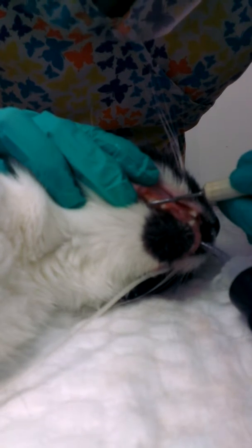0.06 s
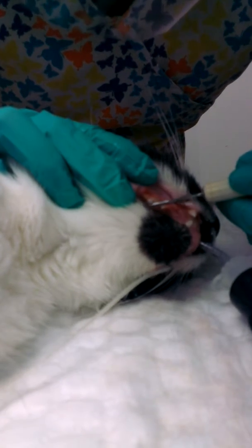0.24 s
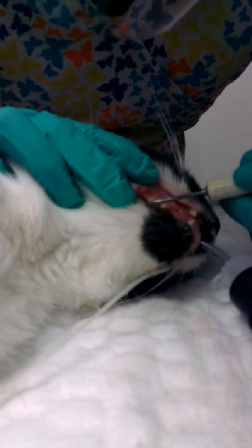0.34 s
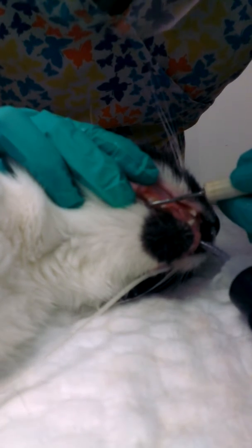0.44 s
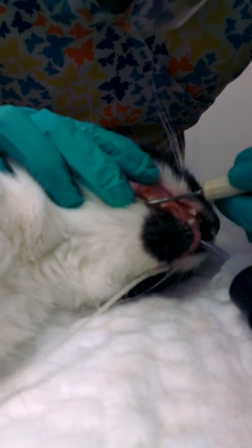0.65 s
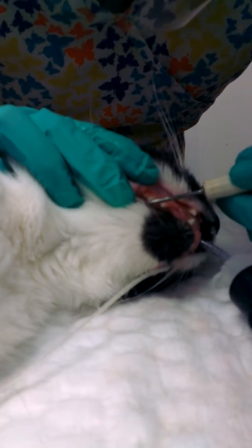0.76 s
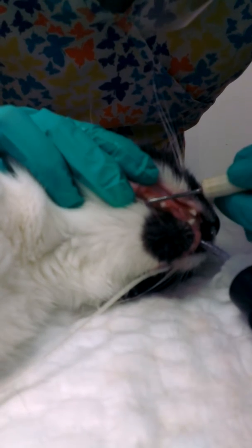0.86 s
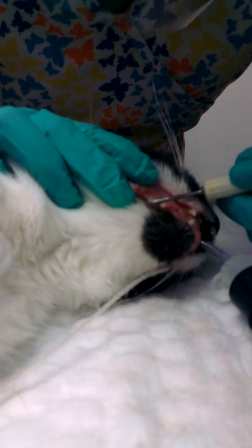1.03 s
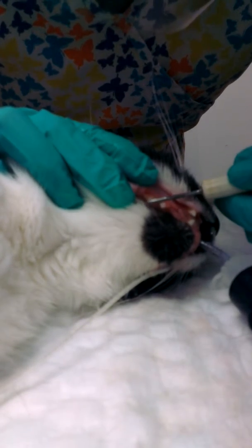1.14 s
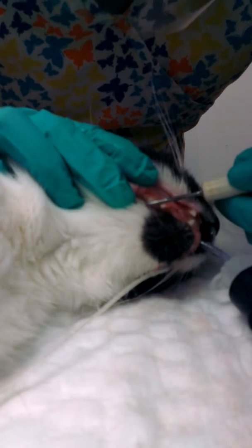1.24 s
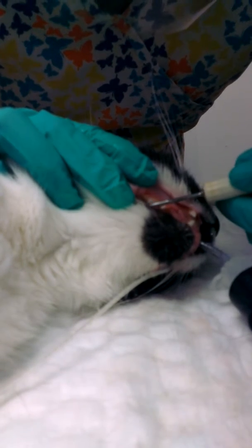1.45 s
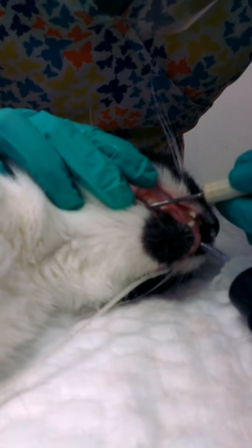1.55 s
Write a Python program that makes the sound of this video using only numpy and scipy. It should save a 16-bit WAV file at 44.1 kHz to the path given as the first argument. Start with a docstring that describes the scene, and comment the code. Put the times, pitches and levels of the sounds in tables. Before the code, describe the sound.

A powered dental scaler chirps lightly on an animal's teeth, then gives its loudest thin, very high squeal at about 0.3 seconds. Faint warbling chatter leads to a longer squeal from 0.65 to 0.8 seconds. Short squeals return near 1.0 and 1.3 seconds, with a tiny chirp near 1.5. Faint water spray hiss and low fan hum continue throughout in the small room.

```python
"""A powered dental scaler squeals on an animal's teeth in a small clinic room.
Pressed on a tooth, the vibrating tip locks on one thin note near 9 kHz. When it bounces, modulation
splits the note into warbling sidebands above and below it. Hard pressure adds a subharmonic buzz,
light touches chirp and dry scrapes rasp. Behind the tip, a water spray hisses and spits as
broadband noise, and motors and mains hum in the low rush of fans."""
import sys
import numpy as np
from scipy import signal
from scipy.fft import rfft, irfft
from scipy.io import wavfile
from scipy.ndimage import uniform_filter1d

SR = 44100
rng = np.random.default_rng(int(sys.argv[2]) if len(sys.argv) > 2 else 0)


def log_audio(samples):
    """Write samples as a 16-bit WAV file to the path given in sys.argv[1]."""
    # one column per channel
    frames = np.atleast_2d(samples).T
    # limit to full scale, then quantise
    limited = np.clip(frames, -1, 1)
    pcm = np.round(limited * 32767).astype(np.int16)
    wavfile.write(sys.argv[1], SR, pcm)


N = 70560
T, FREQS = np.arange(N) / SR, np.fft.rfftfreq(N, 1 / SR)
TIP_HZ = 8969
RASP_DB, JITTER_HZ = -6, 260  # depth and bandwidth of the unevenness of rough contact

# Firm contacts. Each row: start, swell time and fade time in seconds, then first, crest and last
# level in dB.
FIRM_CONTACTS = [(.299, 0.022, 0.0054, -35, -25, -27), (.641, 0.0044, 0.025, -40, -40.5, -44.5),
                 (.666, 0.053, 0.012, -43.5, -31.5, -42), (0.729, 0.0097, 0.027, -36, -28.5, -46),
                 (.767, .015, 0.054, -44, -55, -64), (0.966, 0.015, 0.0035, -47.5, -39, -50),
                 (0.992, 0.0063, 0.0039, -41, -40.5, -35.5), (1.028, 0.024, 0.013, -36, -40, -36),
                 (1.283, 0.047, 0.0095, -40, -32.5, -38.5), (1.341, 0.0028, 0.016, -72, -40.5, -55)]

def squeals():
    """Forced vibration: the pressed tip locks on its note and scrapes a little grit off the tooth."""
    rise_s, stop_s = 0.0013, 0.0027
    envelope = np.zeros(N)
    for start, swell, fade, *levels_db in FIRM_CONTACTS:
        t = T - start
        gate = np.clip(t / rise_s, 0, 1) * np.clip(1 - (t - swell - fade) / stop_s, 0, 1)
        contour = amp(np.interp(t, [0, swell, swell + fade], levels_db))
        envelope = np.maximum(envelope, gate * contour)
    note = np.sin(phase(TIP_HZ + 1.6 * drift(28)))
    grit = amp(-48) * noise(HISS_SPECTRUM)
    tremble = amp(0.5 * drift(140))
    return envelope * (tremble * note + grit)


# Bouncing contacts. Each row: start and length in seconds, level in dB, then first, middle and last
# bounce rate in Hz.
BOUNCING_CONTACTS = [(.027, 0.0077, -51.5, 1040, 1900, 2530), (0.037, 0.016, -49.5, 1880, 1790, 1900),
                     (0.325, 0.02, -28.5, 283, 617, 717), (0.385, 0.017, -48.5, 1610, 1840, 1950),
                     (0.408, 0.021, -48.5, 1580, 1864, 1810), (0.49, 0.0069, -53, 2170, 2280, 2170),
                     (0.55, 0.032, -50.5, 1455, 1910, 1650), (0.62, 0.036, -59, 2880, 2503, 2250),
                     (0.636, 0.017, -53, 1510, 1920, 1700), (.724, 0.0098, -51.5, 2370, 2160, 1900),
                     (0.741, 0.025, -54, 1715, 1950, 1940), (0.765, 0.019, -52, 1640, 1686, 2250),
                     (0.781, 0.016, -55, 1710, 1630, 2170), (0.793, 0.038, -57.5, 2666, 2580, 2390),
                     (0.826, 0.023, -56, 1560, 2060, 1800), (0.865, 0.021, -59, 1120, 2414, 1650),
                     (0.908, 0.012, -59, 1090, 1900, 2180), (0.923, 0.0098, -55.5, 1240, 1940, 1550),
                     (0.936, 0.015, -60, 1400, 1850, 1840), (0.985, 0.0097, -57.5, 2420, 2410, 2550),
                     (1.003, 0.026, -62.5, 2500, 2610, 2620), (1.019, 0.012, -50, 2570, 2635, 2400),
                     (1.085, 0.009, -56.5, 2640, 2670, 2600), (1.26, 0.0089, -56.5, 2540, 2560, 2460),
                     (1.338, 0.0082, -53, 2540, 2566, 2680), (1.345, 0.015, -52.5, 2825, 2890, 3060),
                     (1.367, 0.035, -68.5, 2960, 2900, 2930)]
# Weighting of the sidebands. Each row: frequency in Hz, gain in dB.
SIDEBAND_GAINS = [(6200, 0.5), (7200, -7.5), (8350, -4.5), (11800, 1)]

def bounces():
    """Modulation: bouncing puts sidebands about one bounce rate from the note, and weaker ones beyond."""
    out, grit = np.zeros(N), noise(HISS_SPECTRUM)
    for start, length, db, first_hz, middle_hz, last_hz in BOUNCING_CONTACTS:
        progress, swell = arch(length, 0.5)
        n = len(progress)
        glide = np.polyfit([0, 0.5, 1], [first_hz, middle_hz, last_hz], 2)
        rate = np.polyval(glide, progress) * (1 + 0.075 * drift(JITTER_HZ)[:n])
        roughness = amp(RASP_DB) * min(middle_hz / 1900, 1)  # faster blows are more uneven
        swell = swell * unit(1 + roughness * drift(0.2 * middle_hz)[:n])
        for order in (-2, -1, 0.98, 1.7):
            hz = TIP_HZ + order * rate
            gain = amp(db - 33 * (abs(order) - 1)) * gain_at(SIDEBAND_GAINS, hz)
            add(out, start, swell * gain * np.sin(phase(hz)))
        chatter = (1 + np.cos(phase(rate))) * grit[int(start * SR):][:n]  # each blow scrapes
        add(out, start, swell * amp(db - 30) * chatter)
    return out


# Light touches. Each row: start and length in seconds, level in dB.
LIGHT_TOUCHES = [(0.105, 0.0056, -53.5), (0.13, 0.0029, -52.5), (.178, 0.0035, -42.5), (0.188, 0.0033, -52),
                 (0.202, 0.004, -44), (0.228, 0.008, -38.5), (0.231, 0.0049, -43), (0.236, 0.0066, -34),
                 (0.242, 0.008, -40.5), (0.855, 0.015, -59), (0.958, 0.0055, -41), (1.186, 0.0085, -45.5),
                 (1.2754, 0.0049, -37.5), (1.473, 0.0079, -45.5)]

def touches():
    """Random frequency modulation: grazing contacts give short unsteady chirps with a little scratch."""
    out, scratch = np.zeros(N), amp(-26.5) * noise(HISS_SPECTRUM)
    scatter_hz = 109
    for start, length, db in LIGHT_TOUCHES:
        _, swell = arch(length, 0.79)
        n = len(swell)
        chirp = np.sin(phase(TIP_HZ + scatter_hz * drift(470)[:n]))
        add(out, start, amp(db) * swell * (chirp + scratch[int(start * SR):][:n]))
    return out


# Hard presses. Each row: start and length in seconds, then levels of the low and the high tone in dB.
HARD_PRESSES = [(0.315, 0.010, -66, -47), (0.648, 0.092, -68, -57.5), (0.698, 0.039, -61.5, -59),
                (0.749, 0.022, -66, -59), (1.027, 0.036, -63, -66), (1.051, 0.013, -67, -59),
                (1.061, 0.018, -57, -68)]

def buzzes():
    """Period doubling: hard pressure adds tones at a half and at one and a half times the pitch."""
    low, high = np.zeros((2, N))
    angle = phase(TIP_HZ + 24.3 * drift(260))
    for start, length, low_db, high_db in HARD_PRESSES:
        _, swell = arch(length, 0.47)
        add(low, start, amp(low_db) * swell)
        add(high, start, amp(high_db) * swell)
    rasp = 1 + amp(RASP_DB) * drift(JITTER_HZ) / 2
    return rasp * (low * np.sin(0.5 * angle) + high * np.sin(1.5 * angle))


# Dry scrapes. Each row: start and length in seconds, level in dB.
DRY_SCRAPES = [(0.795, 0.015, -66), (1.011, 0.019, -62), (1.321, 0.038, -67.5)]
# Spectrum of a scrape. Each row: frequency in Hz, relative spectral density in dB.
SCRAPE_SPECTRUM = [(3500, -24), (5200, 5), (6500, -25), (11500, -14), (12700, -12), (14500, -7)]

def scrapes():
    """Friction noise: the tip drags over the tooth with a short dry rasp."""
    envelope = np.zeros(N)
    for start, length, db in DRY_SCRAPES:
        _, swell = arch(length, 0.47)
        add(envelope, start, amp(db) * swell)
    return envelope * noise(SCRAPE_SPECTRUM)


# Envelope of the free-running tip. Each row: time in seconds, level in dB.
WHINE_ENVELOPE = [(0, -57), (.05, -90), (.12, -65), (.26, -59), (.41, -95), (.45, -60), (.55, -87),
                  (.62, -58.5), (.88, -81), (.905, -59), (.94, -76), (1.09, -88), (1.14, -64), (1.21, -54),
                  (1.25, -77), (1.41, -56.5), (1.45, -81), (1.52, -55), (1.6, -63)]

def idle_whine():
    """Unloaded vibration: the running tip keeps a faint, wavering whine, heard between contacts."""
    return level(WHINE_ENVELOPE) * np.sin(phase(TIP_HZ + 20.3 * drift(160)))


# Spectrum of the spray and of the tip's grit. Each row: frequency in Hz, relative density in dB.
HISS_SPECTRUM = [(900, -17.5), (3000, -17.5), (4000, -12.5), (5000, -4.5), (6500, -4), (8000, -5),
                 (8650, 0), (8960, 15), (9300, 4), (10200, -0.5), (11500, 0.5), (13000, -8.5), (15000, -7)]
# Envelope of the spray. Each row: time in seconds, level in dB.
SPRAY_ENVELOPE = [(0, -66.5), (.31, -65), (.335, -58.5), (.355, -61.5), (.55, -67), (.7, -62), (.85, -62),
                  (.95, -65), (1.1, -62), (1.17, -69), (1.27, -63.5), (1.345, -68.5), (1.42, -69),
                  (1.6, -67.5)]
# Larger droplets. Each row: time in seconds, level in dB.
LARGE_DROPLETS = [(0.109, -60.5), (.128, -60), (0.545, -53.5), (1.469, -52.5), (1.475, -55)]

def spray():
    """Shot noise: droplets spit off the tip as random impulses within the hiss of the mist."""
    drops_per_s, tick_decay_s = 1100, 0.00099
    impulses = rng.choice([-1, 1], N) * (rng.random(N) < drops_per_s / SR)
    sizes_db = 4 * np.minimum(rng.exponential(1, N), 3)
    spit = 0.42 * unit(impulses * amp(sizes_db))
    sides = [colour(sputter(rng.standard_normal(N) + spit), HISS_SPECTRUM) for _ in range(2)]
    envelope = level(SPRAY_ENVELOPE)
    for start, db in LARGE_DROPLETS:
        add(envelope, start, amp(db) * np.exp(-T / tick_decay_s))
    return np.array(sides) * envelope * amp([[-0.5], [0]])


def sputter(x, depth_db=2.5):
    """Random amplitude modulation: each frequency band swells and dips on its own."""
    bands = signal.stft(x, nperseg=256)[2]
    patches = uniform_filter1d(rng.standard_normal(bands.shape), size=5, axis=0)
    patches = unit(uniform_filter1d(patches, size=9, axis=1))
    return signal.istft(bands * amp(depth_db * patches), nperseg=256)[1][:N]


# Hum tones. Each row: frequency in Hz, left and right level in dB, left phase lead in radians,
# pitch waver in Hz, flutter as a fraction of the amplitude.
HUM_TONES = [(119, -79.5, -82.5, -1.51, 2.6, 0.25), (210, -71, -68, -1.58, 0.64, 0.11),
             (310.5, -96, -74, -1.4, 2.7, 0.46), (420, -72, -66.5, 1.41, 1.4, 0.64),
             (572, -76, -88.5, 1.94, 3.36, 0.48)]

def hum():
    """Periodic vibration: motors and mains give low tones that waver in pitch and flutter in level."""
    out = np.zeros((2, N))
    for hz, left_db, right_db, lead, waver_hz, flutter in HUM_TONES:
        angle = phase(hz + waver_hz * drift(18)) + 2 * np.pi * rng.random()
        envelope = unit(abs(1 + flutter * drift(32)))
        out[0] += amp(left_db) * envelope * np.sin(angle + lead)
        out[1] += amp(right_db) * envelope * np.sin(angle)
    return out


# Spectrum of the fans at each ear. Each row: frequency in Hz, relative spectral density in dB.
FAN_SPECTRUM_LEFT = [(25, -42), (60, -36), (110, -1.5), (170, -11), (260, -17.5), (350, -22), (470, -12.5),
                     (600, -6), (800, -15), (1200, -22.5), (3000, -24.5), (8000, -22)]
FAN_SPECTRUM_RIGHT = [(25, -40), (60, -20), (110, -14), (170, -4), (260, -2.5), (350, 3.5), (470, 4.5),
                      (600, -19), (800, -15.5), (1200, -22.5), (3000, -26), (8000, -31)]
# Likeness at the two ears. Each row: frequency in Hz, coherence from 0 to 1, left lead in radians.
FAN_COHERENCE = [(113, 0.59, -1.5), (317, 1, 1), (338, 0.97, -4.5), (576, 1, -6), (665, 0.21, -5.5)]

def fans():
    """Partial coherence: the low rush of fans is only partly alike at the two ears."""
    hz, coherences, leads = np.transpose(FAN_COHERENCE)
    coherence, lead = np.interp(FREQS, hz, coherences), np.interp(FREQS, hz, leads)
    right, independent = rng.standard_normal((2, N))
    shared = coherence * np.exp(1j * lead) * rfft(right)
    left = irfft(shared + np.sqrt(1 - coherence ** 2) * rfft(independent), N)
    return np.array([amp(-74) * colour(left, FAN_SPECTRUM_LEFT),
                     amp(-69) * colour(right, FAN_SPECTRUM_RIGHT)])


# Swell of the drone. Each row: time in seconds, gain in dB.
DRONE_GAIN = [(.45, -2), (.85, 1), (1.35, -4.5), (1.48, 5), (1.6, -0.5)]

def equipment():
    """Superposition: fans and hum add, and one narrow band of the sum swells and sinks as a drone."""
    centre_hz, width_hz = 430, 20
    both = fans() + hum()
    drone = irfft(rfft(both) * np.exp(-((FREQS - centre_hz) / width_hz) ** 2), N)
    return both + (level(DRONE_GAIN) - 1) * drone


def room(x, left_db, near_db, tail_db, right_delay_s=2.85e-5):
    """Reflection: echoes from mouth and table, then the room's short tail, follow the direct sound."""
    right = irfft(rfft(x) * np.exp(-2j * np.pi * FREQS * right_delay_s), N)
    direct = np.array([amp(left_db) * x, right])
    near = amp(near_db) * echoes(x, t60_s=0.035, gap_s=0)
    tail = amp(tail_db) * echoes(x, t60_s=0.11, gap_s=0.0054)
    return direct + near + tail


def echoes(x, t60_s, gap_s):
    """Diffuse reverberation: scattered reflections decay exponentially, different at each ear."""
    t = T[:SR // 2]
    response = rng.standard_normal((2, len(t))) * (t > gap_s) * amp(-60 * t / t60_s)
    return signal.fftconvolve(x[None], response / np.linalg.norm(response[0]), axes=1)[:, :N]


def amp(db):
    """Amplitude ratio of a level in decibels."""
    return 10 ** (np.asarray(db) / 20)


def unit(x):
    """Normalisation to rms 1."""
    return x / np.sqrt(np.mean(x ** 2) + 1e-20)


def add(mix, start_s, sound):
    """Superposition of a sound on the mix at a given time."""
    part = mix[max(round(start_s * SR), 0):][:len(sound)]
    part += sound[:len(part)]


def gain_at(spectrum, hz):
    """Gain of a spectrum, interpolated on a log-frequency axis."""
    f, db = np.transpose(spectrum)
    return amp(np.interp(np.log(abs(hz) + 1), np.log(f), db))


def level(curve):
    """Gain over time, interpolated from a curve in dB."""
    return amp(np.interp(T, *np.transpose(curve)))


def colour(x, spectrum):
    """Filtering by a spectrum, scaled to rms 1."""
    return unit(irfft(rfft(x) * gain_at(spectrum, FREQS), N))


def noise(spectrum):
    """Gaussian noise with a given spectrum, at rms 1."""
    return colour(rng.standard_normal(N), spectrum)


def drift(bandwidth_hz):
    """Smooth random fluctuation: low-pass noise of rms 1."""
    low_pass = np.exp(-(FREQS / bandwidth_hz) ** 2) * (FREQS > 0)
    return unit(irfft(rfft(rng.standard_normal(N)) * low_pass, N))


def phase(hz):
    """Phase in radians as the integral of frequency."""
    return 2 * np.pi * np.cumsum(hz) / SR


def arch(length_s, sharpness):
    """Progress from 0 to 1 through a contact, and its envelope of swell and fade."""
    progress = np.linspace(0, 1, int(length_s * SR))
    return progress, abs(np.sin(np.pi * progress ** 0.86)) ** sharpness


def scene():
    """Directivity: the steady note beams to the right, while the unsteady sounds scatter all round."""
    steady = room(squeals() + idle_whine(), left_db=-7.5, near_db=-35, tail_db=-28)
    rattle = room(bounces(), left_db=-2.5, near_db=-3, tail_db=-10.5)
    brief = room(touches() + buzzes() + scrapes(), left_db=-4, near_db=-12, tail_db=-6)
    return steady + rattle + brief + spray() + equipment()


def record(dry, cutoff_hz=15400):
    """Band limiting: a steep low-pass filter removes the highest treble."""
    low_pass = signal.firwin(401, cutoff_hz, window=("kaiser", 9), fs=SR)
    return signal.oaconvolve(dry, low_pass[None], "same")


dry = scene()
out = record(dry)
log_audio(out)
```